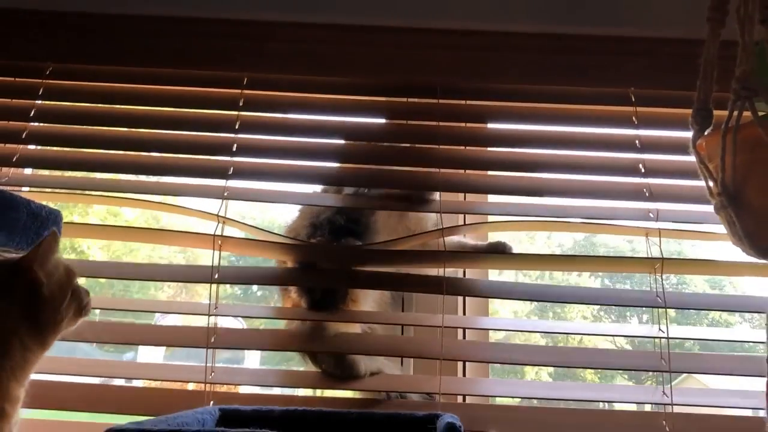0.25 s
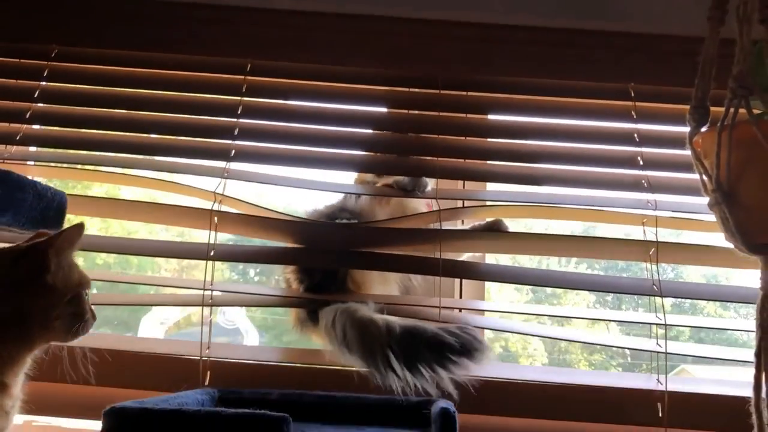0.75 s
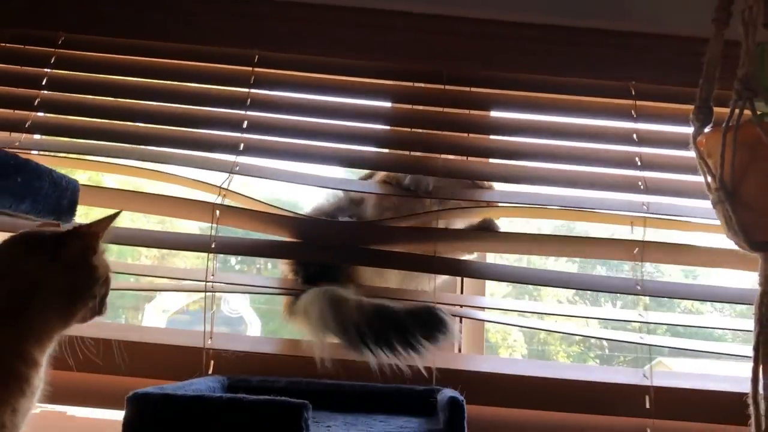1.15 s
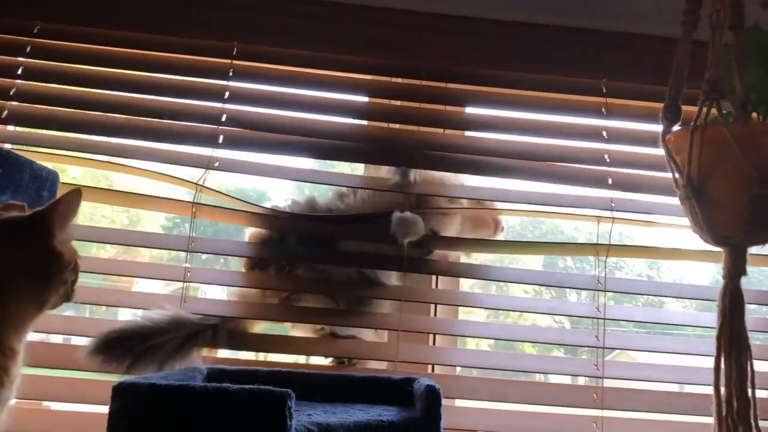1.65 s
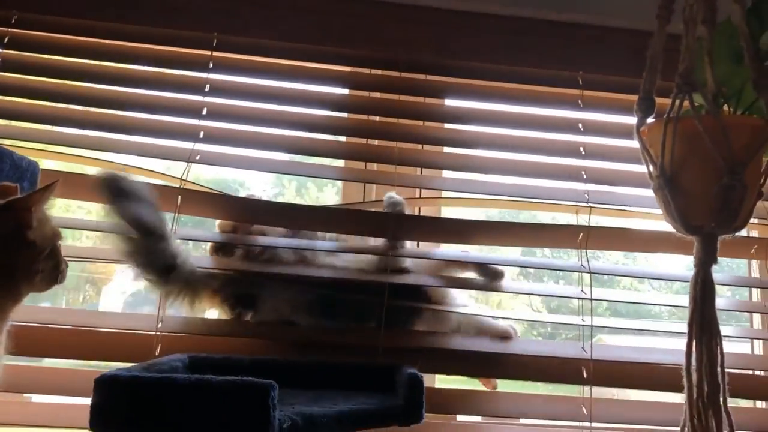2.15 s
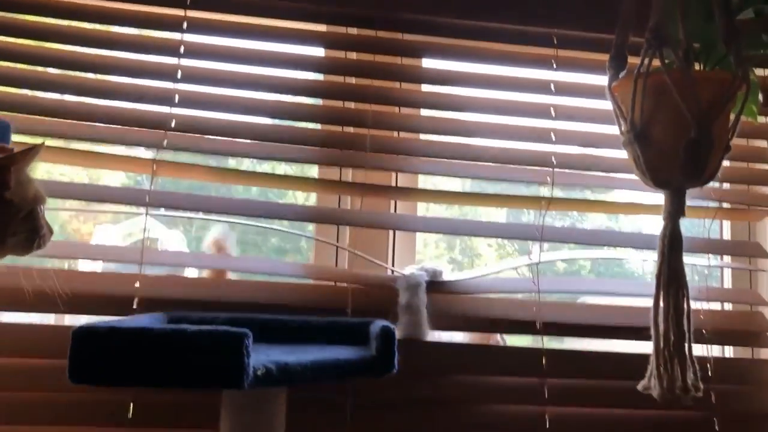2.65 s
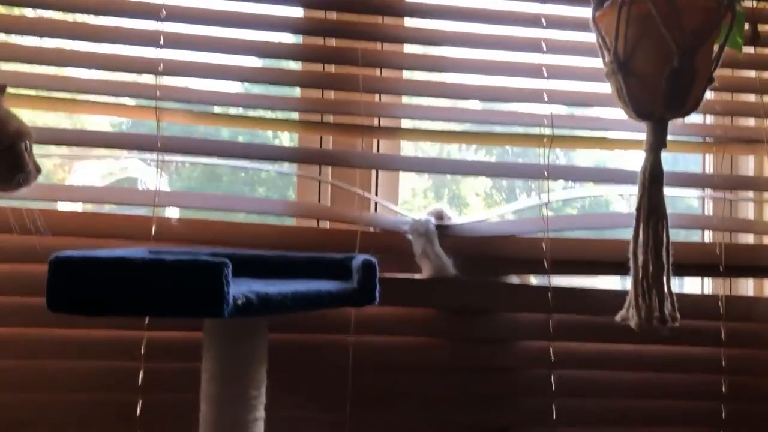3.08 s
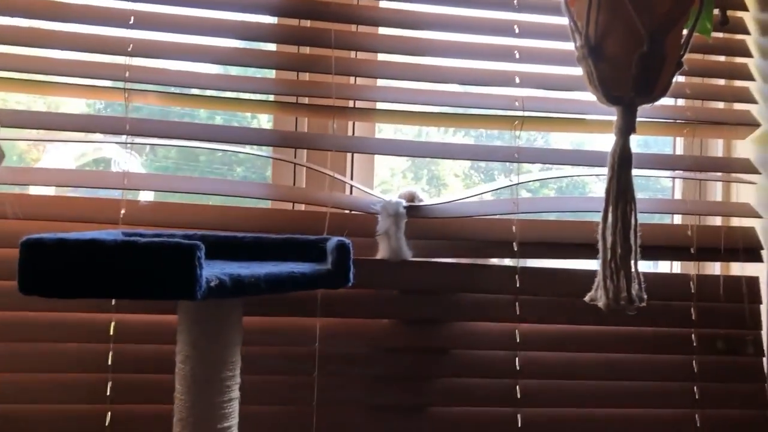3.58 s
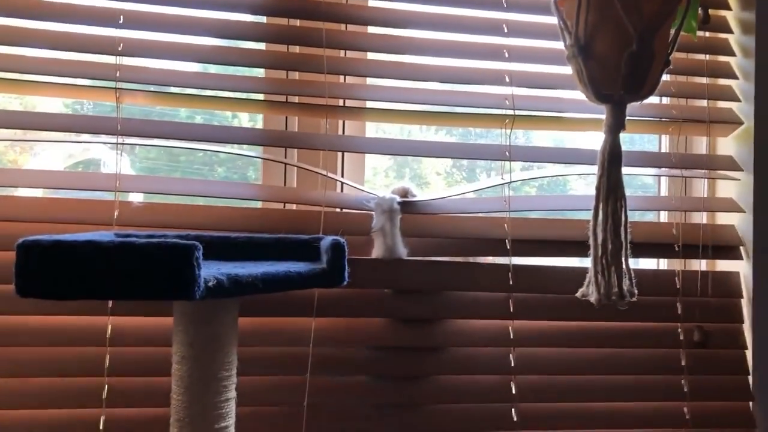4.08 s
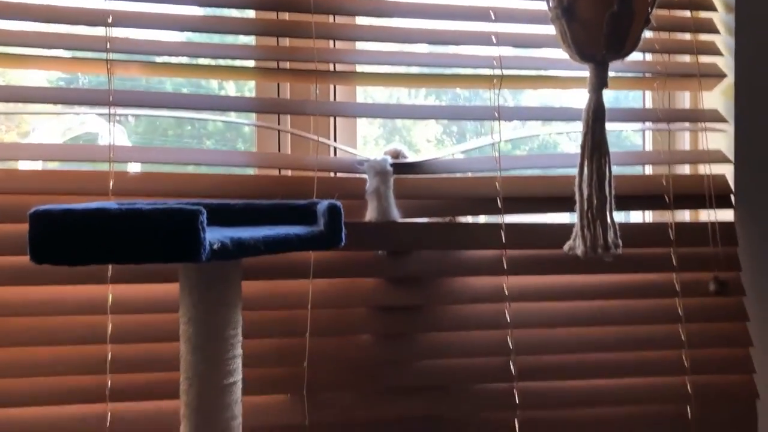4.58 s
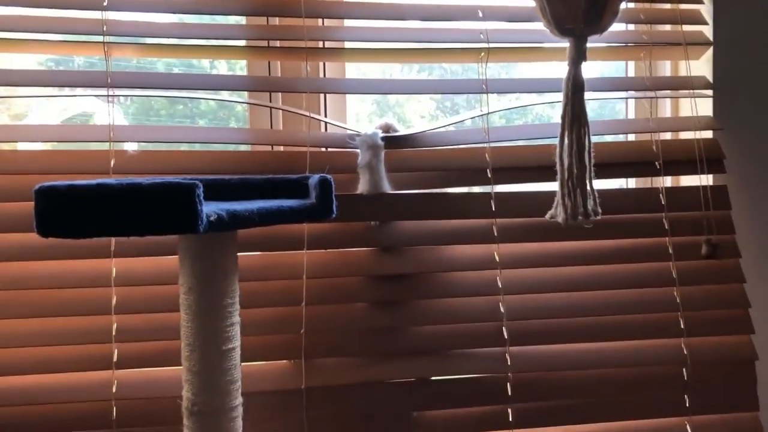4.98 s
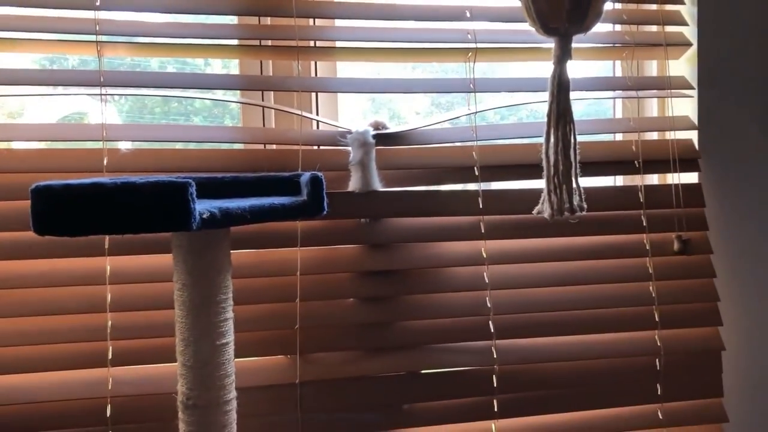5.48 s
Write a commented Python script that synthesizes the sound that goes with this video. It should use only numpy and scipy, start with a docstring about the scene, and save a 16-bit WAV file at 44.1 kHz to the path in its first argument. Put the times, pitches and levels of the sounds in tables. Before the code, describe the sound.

Wooden blind slats rustle, clatter and bump hollowly against a window as a cat pushes through, thinning to a few clicks.

```python
"""In a small room, a cat clambers through a wooden window blind, heard close up in mono.
The slats clack as they hit each other and scrape as they slide; fur brushes their edges.
The cat drops behind them with dull thumps, and the blind swings and shudders against the window,
then settles with a few last clicks. The cords hiss as they run through their holes.
Underneath are still air, a faint hum and the low rumble of a hand on the camera."""
import sys
import numpy as np
from scipy import signal
from scipy.fft import rfft, irfft, next_fast_len
from scipy.io import wavfile
from scipy.ndimage import uniform_filter1d

SR = 44100
rng = np.random.default_rng(int(sys.argv[2]) if len(sys.argv) > 2 else 0)


def store_wav(level_fs):
    """Save 16-bit WAV to argv[1]."""
    pcm = np.round(np.clip(np.atleast_2d(level_fs), -1, 1) * 32767)
    wavfile.write(sys.argv[1], SR, pcm.T.astype(np.int16))


N = 252693

# the notes a slat rings with: f/Hz, level/dB, time to fade by 60 dB/s
SLAT_NOTES = [(701, -12, 0.096), (845, -7.5, 0.022), (1268, -12, 0.038), (1550, -14, 0.12),
              (1656, -14.5, 0.19), (1837, -5.5, 0.037), (2666, -14, 0.037), (3200, -13.5, 0.031),
              (4230, -7.5, 0.032)]
# the tone of wood cracking against wood: f/Hz, level/dB
CRACK_TONE = [(60, -42.5), (200, -11.5), (400, 1.5), (800, -3), (1700, -7), (2200, -6.5), (4200, -5),
              (6000, -6.5), (10000, -6.5), (15500, -10.5)]
# slat hitting slat: t/s, level/dB, low knock/dB, high snap/dB, snap brightness/(dB per octave), ring f/Hz
CLACKS = [(0.171, -47.5, -34, -18, -18, 1730), (0.7394, -52.5, -1, 3, -2, 4470),
          (1.279, -40.5, -11, 6, 0, 1860), (1.327, -46.5, -19, 4, 2, 1610),
          (1.3934, -35, -1.5, -24, -33, 1180), (1.696, -32.5, -8, -7, 5.5, 1820),
          (1.8587, -46, 14, 2, 0, 690), (1.8881, -43, 7, -0.5, 3, 2030), (1.915, -34.5, 7, -5.5, 0, 1360),
          (2.1199, -38.5, 10, 3, -6, 1100), (2.1764, -40, 7, 1, -6, 1550), (2.2166, -27, 1.5, 1, -4, 1590),
          (2.3218, -33.5, -4, -6.5, -1.5, 1540), (2.4447, -27, -25, -3, 0.5, 1580),
          (2.563, -50, -14, 11, -6.5, 930), (2.7459, -37, 10.5, 6, 5, 1710),
          (2.7797, -30.5, -18, 3, -5, 1580), (2.815, -30, -6, -5, 1, 1580),
          (2.8543, -26.5, -0.5, 3, -9, 2555), (2.8701, -31.5, -2, 2, 0, 1300),
          (2.8787, -17.5, -13.5, -6.5, 1.5, 800), (2.8868, -25, 5.5, 2.5, -4, 1650),
          (2.925, -29, -6, -4, -7, 1610), (2.9905, -29, -24, -11, 8, 1670),
          (3.026, -36.5, -17, -3, -10.5, 1530), (3.1109, -22.5, -26, -15.5, -13.5, 1050),
          (3.1254, -37, -6, 2, -3.5, 1010), (3.4427, -29.5, -11, -9.5, 0, 1760),
          (3.4597, -31.5, -21, -14, -10, 1630), (3.521, -30, -5, 0, -5.5, 970),
          (3.5375, -24, -29, -8, -8, 1780), (3.7654, -35.5, -4, -7.5, -4, 1570),
          (3.8235, -32, 2, -12, 2, 825), (3.985, -45, -8, -30, -11, 816),
          (4.0225, -39, -35, -5.5, -0.5, 1500), (4.0709, -34.5, -4, -6.5, -8.5, 1590),
          (4.3178, -29.5, -1, 1, -2.5, 1270), (4.4368, -36, -3, -11, -1.5, 1640),
          (4.755, -31, -4, -2.5, -2.5, 1690), (4.7842, -31, -18, -11.5, -12, 1620),
          (5.1567, -37.5, -3.5, -10.5, -4, 1690)]
def clacks():
    """Slats hit each other: a sharp crack and a wooden ring, a little different every time."""
    out, t = np.zeros(N), np.arange(SR // 2) / SR
    snap_centre_hz = 6490
    for s, db, knock_db, snap_db, tilt_db, ring_hz in CLACKS:
        snap = [(hz, snap_db + tilt_db * np.log2(hz / snap_centre_hz)) for hz in (2800, 13000)]
        contact = [(500, knock_db + 3.0), (1000, 0), (2000, 0.0084)] + snap
        tone = lambda hz: along(contact, hz)
        crack_fade = fade(t, 0.013) + amp(-5.5) * fade(t, 0.069)  # a quick burst, then a softer tail
        crack = filtered(noise(CRACK_TONE, len(t)), tone) * crack_fade
        wood = amp(-6.5) * ring(SLAT_NOTES, t, tone, scatter_db=4.0, detune=0.0207)
        note = amp(tone(ring_hz) - 2.5) * np.sin(2 * np.pi * ring_hz * t) * fade(t, 0.032)
        hit = (crack + wood + note) * rise(t, 0.001)
        add(out, s, amp(db) * in_room(hit, wet_db=-6.0))
    return out


# the notes of the window and its frame: f/Hz, level/dB, time to fade by 60 dB/s
WINDOW_NOTES = [(128, -16, 0.15), (170, -19, 0.13), (200, -13.5, 0.19), (264.5, -5, 0.13), (309, -14, 0.41),
                (372, 0, 0.051), (440.4, -18, 0.19), (631.2, -7.5, 0.085), (757, -16, 0.16),
                (855, -10.5, 0.071), (946, -11.5, 0.043), (991, -21, 0.25), (1450, -11, 0.085),
                (1690, -21.5, 0.13), (2034, -16.5, .08)]
# the tone of a dull blow: f/Hz, level/dB
THUD_TONE = [(30, -42), (70, -18), (125, -10.5), (170, -6), (260, 12.5), (380, 7.5), (520, -3), (900, -5),
             (1600, -10), (2300, -12), (3000, -33.5), (8000, -60)]
# the blind hitting the window: t/s, level/dB, ring f/Hz, hardness/dB, rattle f/Hz,
# time between bounces/s, loss per bounce/dB
BUMPS = [(1.858, -36.5, 221, -26, 633, 0.025, 14), (2.118, -41.5, 366, 17, 1220, 0.02, 25),
         (2.39, -49.5, 213, 15, 860, 0.015, 18), (2.446, -45.5, 253, 23, 650, 0.02, 6),
         (2.866, -28.5, 318, 7, 930, 0.015, 22), (3.112, -18, 372, -5, 970, 0.0143, 0),
         (3.155, -20, 266, -16.5, 627, 0.049, 11.5), (3.262, -19, 382, -19.5, 626, 0.046, 18.5),
         (3.514, -22, 267, -14, 587, 0.02, 14), (3.612, -29.5, 281, -23, 900, 0.024, 33),
         (3.796, -23.5, 265, -14.5, 760, 0.0105, 6.5), (3.835, -25.5, 379, -10, 770, 0.025, 4.5),
         (4.566, -40, 325, -10, 576, 0.015, 15), (4.823, -46, 302, -10, 640, 0.016, 22)]
def bumps():
    """The blind's bottom rail hits with a hollow note; the window rings and its frame rattles."""
    out, t = np.zeros(N), np.arange(SR * 3 // 4) / SR
    for s, db, ring_hz, hard_db, rattle_hz in bounces(count=4, soften_db=2.5):
        hardness = [(430, 0.0033), (650, hard_db + 8.5)]  # harder blows sound brighter
        blow_tone = lambda hz: along(hardness, hz) + 7 * peak(hz, rattle_hz, octaves=0.26)
        pane_tone = lambda hz: blow_tone(hz) + 6 * peak(hz, ring_hz, octaves=0.11)
        rail = amp(4) * np.sin(2 * np.pi * ring_hz * t) * fade(t, 0.055)
        pane = amp(-2.5) * ring(WINDOW_NOTES, t, pane_tone, scatter_db=-1.0, detune=0.0039)
        thud = amp(-4.5) * filtered(noise(THUD_TONE, len(t)), blow_tone) * fade(t, 0.06)
        hit = (rail + pane) * rise(t, 0.0042) + thud * rise(t, 0.0015)
        add(out, s, amp(db - 0.5) * in_room(hit, wet_db=-7))
    return out


def bounces(count, soften_db):
    """Each bump becomes a row of evenly spaced hits, each duller and usually weaker than the last."""
    return [(s + k * gap, db - k * loss_db, ring_hz, hard_db - k * soften_db, rattle_hz)
            for s, db, ring_hz, hard_db, rattle_hz, gap, loss_db in BUMPS for k in range(count)]


# the tone of wood scraping wood: f/Hz, level/dB
SKID_TONE = [(80, -36), (250, 1), (700, 7.5), (1200, 8.5), (1700, 11), (2100, 6.5), (2500, 8), (3000, -2.5),
             (4400, -1), (7000, -7.5), (15500, -13)]
# single scrapes: loudest t/s, level/dB, fall time/s, brightness/(dB per octave)
SKIDS = [(0.01, -57.5, 0.03, -1.5), (0.248, -54.5, 0.037, -0.5), (0.334, -53, 0.04, 3.5),
         (0.684, -54, 0.02, -4), (1.164, -53, 0.021, 0.5), (1.339, -44, 0.066, 0.5),
         (1.399, -32.5, 0.033, 1.5), (1.75, -48.5, 0.07, -9.5), (2.055, -47, 0.008, 8),
         (2.16, -43, 0.016, -14), (2.394, -43.5, 0.017, -12), (2.465, -46.5, 0.06, -15.5),
         (2.688, -36, 0.016, 1), (2.735, -36, 0.02, 0.5), (5.253, -59, 0.014, -5), (5.381, -55.5, 0.07, -9)]
def skids():
    """Slats catch and slip over each other in a scrape that swells fast and dies away more slowly."""
    out, t = np.zeros(N), np.arange(N) / SR
    for s, db, fall_s, tilt_db in SKIDS:
        rise_s = 0.4 * fall_s
        stroke = np.exp(-np.maximum((s - t) / rise_s, (t - s) / fall_s))
        tone = lambda hz: along(SKID_TONE, hz) + tilt_db * np.log2(np.maximum(hz, 500) / 1700)
        out += amp(db) * stroke * friction(tone, slips_per_s=1900, slip_db=-14.0)
    return in_room(drift(out, depth_db=2.35), wet_db=-6.5)


# the tones of slats rubbing, slats bending and fur brushing, each: f/Hz, level/dB
RUB_TONE = [(500, -54), (900, -4.5), (1350, -2), (1700, 2.5), (2300, -4.5), (3300, -9.5), (4500, -5.5),
            (5600, -11), (8000, -29)]
BEND_TONE = [(30, -25), (50, -7), (80, -8), (130, 1.5), (270, 6.5), (450, 0), (750, -1.5), (1100, -1.5),
             (2500, -29)]
FUR_TONE = [(3000, -45), (6000, 3.5), (8000, 8), (12000, 3.5), (15500, 11.5)]
# how hard the cat pushes the slats about: t/s, level/dB
EFFORT = [(0.0, -77.5), (0.25, -69.5), (0.38, -60.5), (1.2, -65), (1.37, -56.5), (2.15, -56.5), (2.28, -53),
          (2.68, -50.5), (2.94, -44.5), (3.25, -54.5), (3.73, -54.5), (3.8, -57.5), (4.45, -61),
          (4.58, -67.5), (5.07, -72), (5.33, -68.5), (5.51, -73), (5.73, -73)]
def rubbing():
    """The cat's weight bends the slats and drags them along each other; fur brushes their edges."""
    rub_tone = lambda hz: along(RUB_TONE, hz) + 4 * peak(hz, 1690, octaves=0.037)
    rub = amp(-3) * friction(rub_tone, slips_per_s=99, slip_db=-5)
    bend = amp(-5) * friction(lambda hz: along(BEND_TONE, hz), slips_per_s=83, slip_db=-8)
    fur = amp(-7.5) * friction(lambda hz: along(FUR_TONE, hz), slips_per_s=180, slip_db=-7.5)
    moving = amp(slat_motion_db()) * rub + amp(over_time(EFFORT)) * (bend + fur)
    return in_room(drift(moving, depth_db=3.0), wet_db=-11.0)


def slat_motion_db(settle_s=0.049):
    """How much the slats move: the cat's pushing plus the shaking after each bump."""
    power = amp(over_time(EFFORT)) ** 2
    for s, db, *_ in BUMPS:
        t = since(s)
        shake = amp(-36.5 + 0.54 * db) * (t > 0) * np.exp(-t / settle_s)
        power += shake ** 2
    return 10 * np.log10(power)


def rattle(taps=190):
    """Loose slats tap each other at random, louder the more they are moving."""
    out, t = np.zeros(N), np.arange(SR // 8) / SR
    motion_db = slat_motion_db()
    for when, size, pitch in rng.random((taps, 3)):
        start = int(when * (N - 1))
        tone = lambda hz: 12 * peak(hz, 600 * 3 ** pitch, octaves=0.8)
        wood = ring(SLAT_NOTES, t, tone, scatter_db=1.5, detune=0.1) * fade(t, 0.2)
        tick = amp(2.5) * noise(CRACK_TONE, len(t)) * fade(t, 0.014)
        tap_db = motion_db[start] + 6 * size - 3
        add(out, start / SR, amp(tap_db) * (wood + tick))
    return in_room(out, wet_db=-8.5)


# the tones of a cord's thin hiss and its lower rasp, each: f/Hz, level/dB
HISS_TONE = [(8000, -15), (9500, -14), (10200, -12), (10800, -11), (11500, -8), (12500, -16), (16000, -36)]
RASP_TONE = [(3300, -52), (4100, -3), (4500, 7), (4900, -17), (5800, -38)]
# a cord running through the slats: start t/s, length/s, hiss level/dB, rasp level/dB, hiss shift/Hz
CORD_PULLS = [(0.405, 0.2, -75, -72, -4.5), (0.692, 0.39, -69, -85, 99.5), (3.168, 0.23, -58, -68, -250),
              (3.72, 0.16, -57, -59, 101), (4.464, 0.18, -67, -86, 101)]
def cords(attack_s=0.0071, release_s=0.025, swell_db_per_s=24, glide_hz=500):
    """A tight cord rasps and hisses through its holes; as it speeds up, both swell and the hiss rises."""
    hiss_level, rasp_level, shift_hz = np.zeros((3, N))
    for s, length, hiss_db, rasp_db, offset_hz in CORD_PULLS:
        t = np.minimum(since(s), length)
        gate = np.clip(np.minimum(t / attack_s, (length - t) / release_s), 0, 1)
        sliding = gate * amp(swell_db_per_s * (t - length / 2))
        hiss_level += sliding * amp(hiss_db)
        rasp_level += sliding * amp(rasp_db)
        shift_hz += (gate > 0) * (offset_hz + glide_hz * (t / length - 0.5))
    hiss_tone = lambda hz: along(HISS_TONE, hz) + 9 * peak(hz, 10530, octaves=0.067)
    steady_hiss = friction(hiss_tone, slips_per_s=380, slip_db=-29)
    # move every frequency in the hiss by shift_hz
    hiss = np.real(signal.hilbert(steady_hiss) * np.exp(2j * np.pi * np.cumsum(shift_hz) / SR))
    rasp = friction(lambda hz: along(RASP_TONE, hz), slips_per_s=160, slip_db=2)
    return hiss_level * hiss + rasp_level * rasp


# the tone of a deep rumble: f/Hz, level/dB
RUMBLE_TONE = [(15, -20), (26, -21), (40, -1), (55, -0.5), (80, -10), (130, -2.5), (250, -38.5)]
# the cat landing: t/s, level/dB
THUMPS = [(2.12, -50), (2.72, -70), (2.865, -50)]
def thumps():
    """The cat's weight comes down with a dull, deep thump."""
    level = sum(amp(db) * rise(since(s), 0.0071) * fade(since(s), 0.4) for s, db in THUMPS)
    return level * noise(RUMBLE_TONE, N)


# the tone of still room air: f/Hz, level/dB
AIR_TONE = [(20, -28), (60, 0), (140, 4), (270, 2), (370, -5.5), (600, -5.5), (780, -7), (950, -22.5),
            (1650, -18.5), (2500, -35), (7500, -37), (15500, -30)]
# the faint notes of the room's hum: f/Hz, level/dB
HUM_NOTES = [(599, -79), (780, -79.5)]
def background():
    """Still air, a faint hum, and the rumble of a hand on the camera that slowly steadies."""
    t = np.arange(N) / SR
    air = amp(-67.5) * noise(AIR_TONE, N)
    hum = sum(np.sqrt(2) * amp(db) * np.sin(2 * np.pi * hz * t) for hz, db in HUM_NOTES)
    hand = amp(-67 - 2 * t) * noise(RUMBLE_TONE, N)
    return air + hum + hand


# how long the room echoes: f/Hz, time to fade by 60 dB/s
ROOM_ECHO = [(100, 0.38), (300, 0.48), (600, 0.53), (1700, 0.41), (4000, 0.29), (12000, 0.23)]
def in_room(x, wet_db):
    """The walls add a soft echo, wet_db relative to x, whose high notes die first."""
    hz, t, spectrum = signal.stft(rng.standard_normal(SR * 3 // 4), SR, nperseg=256)
    tail = signal.istft(spectrum * fade(t, along(ROOM_ECHO, hz)[:, None]), SR, nperseg=256)[1]
    tail = np.pad(tail / np.linalg.norm(tail), (SR // 200, 0))  # arrives 5 ms late
    return x + amp(wet_db) * signal.fftconvolve(x, tail)[:len(x)]


def ring(notes, t, tone, scatter_db, detune):
    """A struck object rings with fading notes, their strength and pitch a little random."""
    hz, db, t60 = np.transpose(notes)
    gain = amp(db + tone(hz) + scatter_db * rng.standard_normal(len(hz)))
    pitch = hz * (1 + detune * rng.standard_normal(len(hz)))
    waves = np.sin(2 * np.pi * (pitch[:, None] * t + rng.random((len(hz), 1))))
    return np.sqrt(2) * gain / np.linalg.norm(gain) @ (waves * fade(t, t60[:, None]))


def friction(tone, slips_per_s, slip_db):
    """Sliding surfaces make a hiss dotted with tiny slips of uneven size."""
    slips = (rng.random(N) < slips_per_s / SR) * rng.standard_normal(N)
    return unit(filtered(rng.standard_normal(N) + amp(slip_db) * unit(slips), tone))


def drift(x, depth_db):
    """The tone wanders as the contact moves: a smooth random gain over time and frequency."""
    spectrum = signal.stft(x, nperseg=512)[2]
    wander = rng.standard_normal(spectrum.shape)
    for _ in range(2):
        wander = uniform_filter1d(uniform_filter1d(wander, size=5, axis=0), size=9, axis=1)
    return signal.istft(spectrum * amp(depth_db * unit(wander)), nperseg=512)[1][:len(x)]


def noise(tone_table, size):
    """Steady noise with the tone given in a table."""
    return unit(filtered(rng.standard_normal(size), lambda hz: along(tone_table, hz)))


def filtered(x, tone):
    """Turn each frequency of x up or down by tone(hz) decibels."""
    size = next_fast_len(len(x) + 8192)
    gain = amp(tone(np.fft.rfftfreq(size, 1 / SR)))
    return irfft(rfft(x, size) * gain, size)[:len(x)]


def along(points, hz):
    """Read between (Hz, value) points, with octaves evenly spaced."""
    f, values = np.transpose(points)
    return np.interp(np.log(hz + 1), np.log(f + 1), values)


def peak(hz, centre_hz, octaves):
    """A bell-shaped hill, 1 high at centre_hz."""
    return np.exp(-(np.log2((hz + 1) / centre_hz) / octaves) ** 2)


def over_time(points):
    """Join (s, value) points with straight lines, one value per sample."""
    return np.interp(np.arange(N) / SR, *np.transpose(points))


def since(s):
    """Seconds since time s at every sample, 0 before it."""
    return np.maximum(np.arange(N) / SR - s, 0)


def rise(t, attack_s):
    """Climb smoothly from 0 towards 1."""
    return 1 - np.exp(-t / attack_s)


def fade(t, t60):
    """Die away by 60 dB every t60 seconds."""
    return amp(-60 * t / t60)


def amp(db):
    """Turn decibels into a multiplier."""
    return 10 ** (np.asarray(db) / 20)


def unit(x):
    """Scale to an average (rms) level of 1."""
    return x / np.sqrt(np.mean(x ** 2) + 1e-20)


def add(track, s, sound):
    """Mix a sound in at time s."""
    part = track[max(round(s * SR), 0):][:len(sound)]
    part += sound[:len(part)]


def scene():
    """The cat, the blind and its cords in the quiet room."""
    return (clacks() + bumps() + skids() + rubbing() + rattle() + cords() + thumps() + background())[None]


def record(dry):
    """Cut away the very highest treble."""
    top_hz = 15800
    return np.array([filtered(x, lambda hz: np.where(hz < top_hz, 0, -120)) for x in dry])


dry = scene()
out = record(dry)
store_wav(out)
```